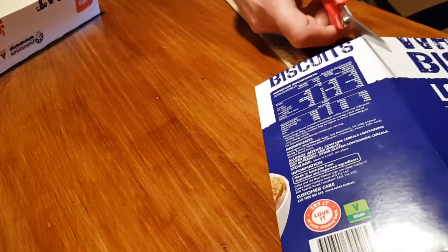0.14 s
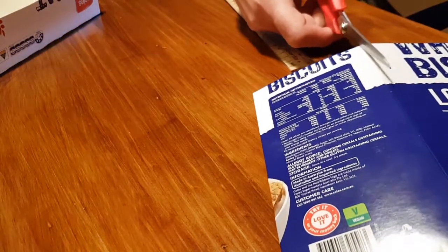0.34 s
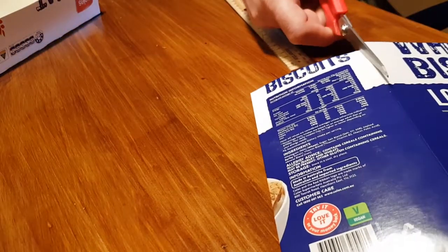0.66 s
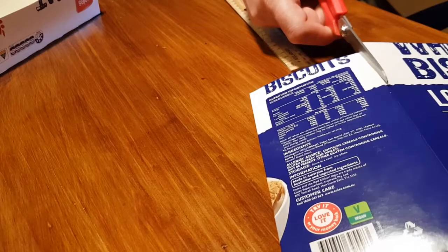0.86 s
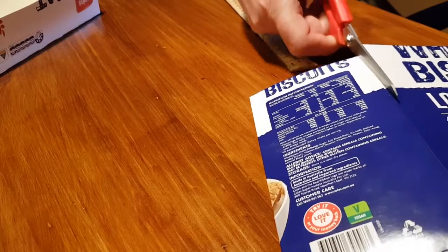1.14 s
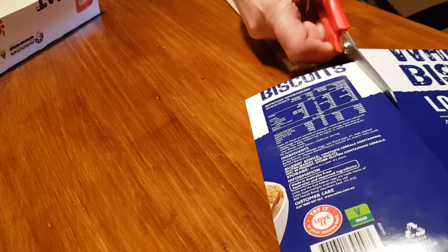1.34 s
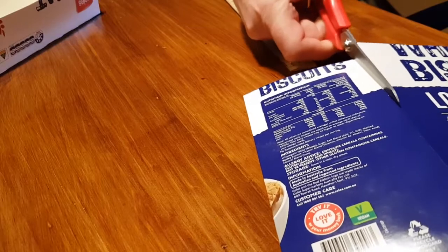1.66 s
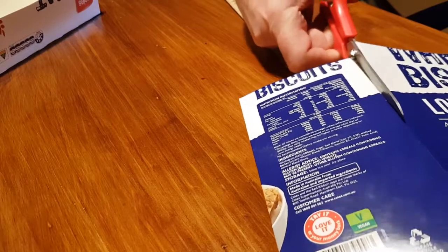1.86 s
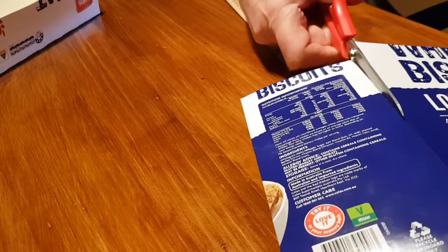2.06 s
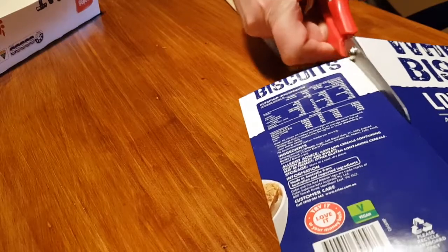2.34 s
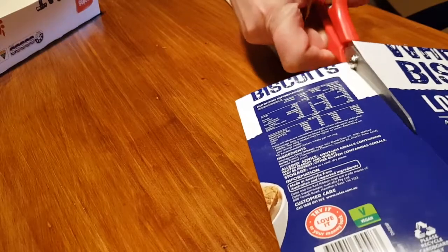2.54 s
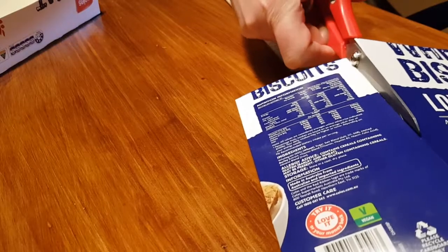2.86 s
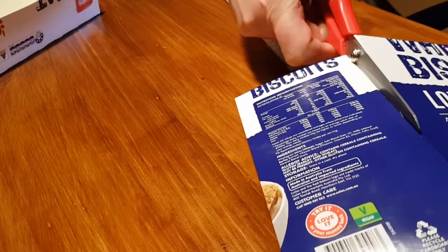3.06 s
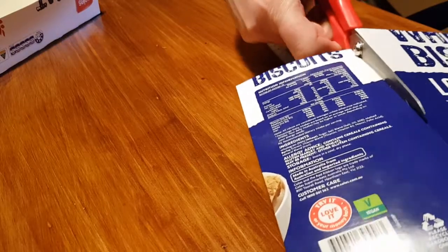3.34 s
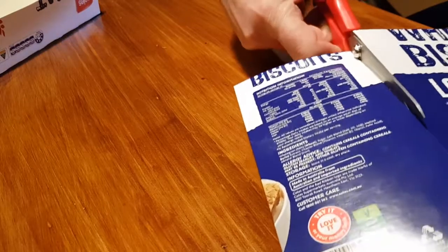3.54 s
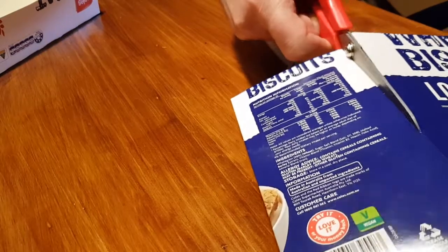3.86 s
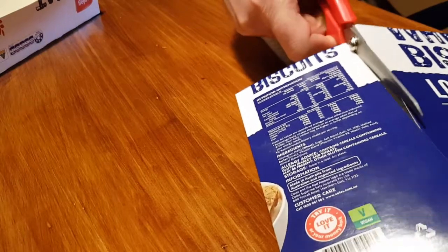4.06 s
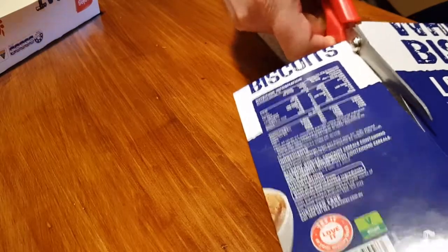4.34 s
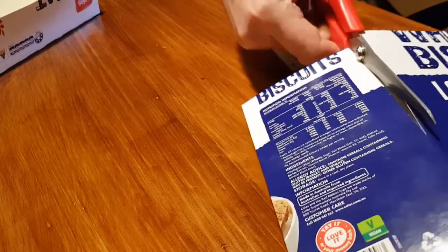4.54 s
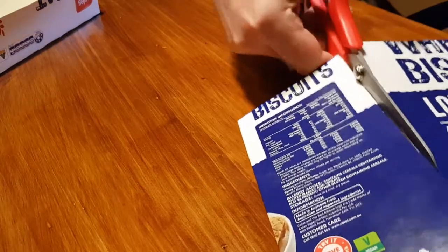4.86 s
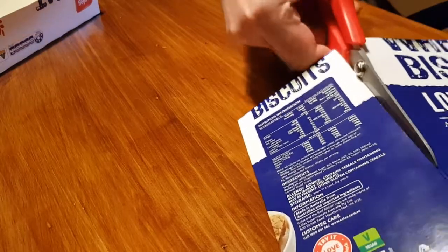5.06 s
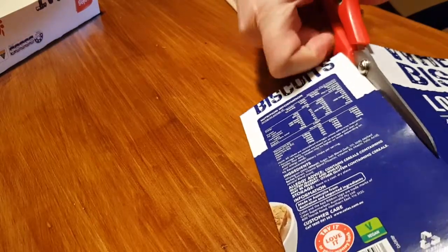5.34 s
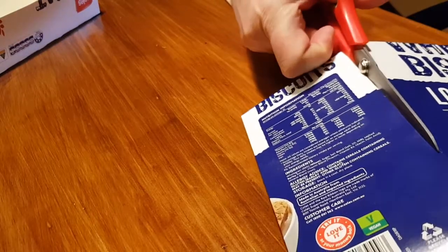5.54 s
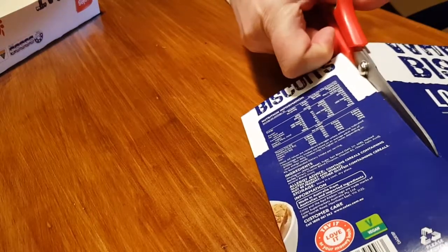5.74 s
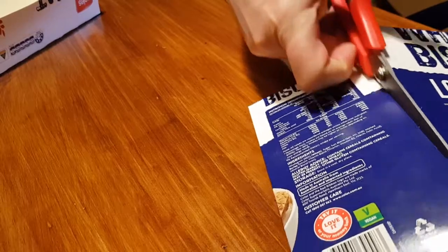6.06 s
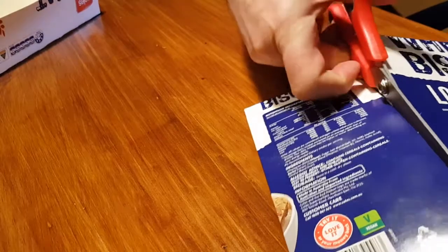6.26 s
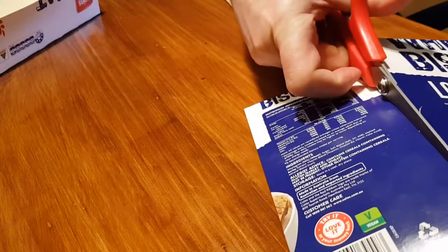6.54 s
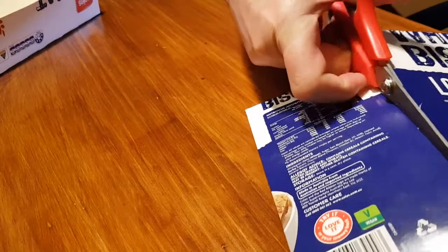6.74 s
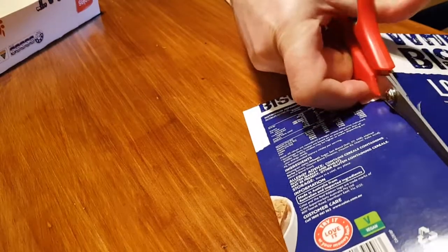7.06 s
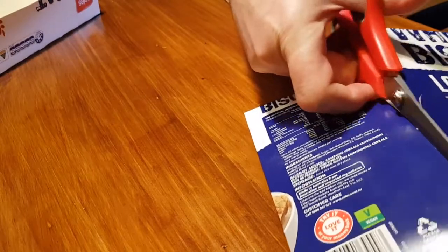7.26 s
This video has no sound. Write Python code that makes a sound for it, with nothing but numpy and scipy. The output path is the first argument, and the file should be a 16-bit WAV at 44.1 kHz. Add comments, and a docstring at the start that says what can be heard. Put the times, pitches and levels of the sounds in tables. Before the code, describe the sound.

Scissors snip through a thin cardboard box with crunchy rasps and hollow cracks, hardest near four and five seconds, low thumps on a wooden table.

```python
"""Scissors cut a thin cardboard box on a wooden table, close to a two-port microphone in a quiet room.
Over a steady hum and low drag, the first strokes and snaps come at about 0.2 s: shearing force rings
the hollow box near 700-900 Hz and rasps in the card, with fibres cracking and blade edges ticking.
The hardest snaps fall near 3.86 s and 5.26 s, with low thumps of table and box as decaying tones;
more thumps and the heaviest drag come at about 7 s, then the last stroke. A noise tail is the room."""
import sys
import numpy as np
from scipy import signal
from scipy.fft import rfft, irfft, next_fast_len
from scipy.io import wavfile

SR = 44100
rng = np.random.default_rng(int(sys.argv[2]) if len(sys.argv) > 2 else 0)


def bounce(signal):
    """Save signal as a 16-bit WAV file at the path given by the first command-line argument."""
    frames = np.transpose(np.atleast_2d(signal))
    limited = np.clip(frames, -1, 1)
    pcm = np.round(limited * 32767).astype(np.int16)
    wavfile.write(sys.argv[1], SR, pcm)


N = 326781

# Blade strokes through the card. Each row: start, turning and stop moment in seconds, force on the box
# at the bite, at the turn and at the stop in dB, rasp over ring in dB, relative treble of the rasp in dB.
BLADE_STROKES = [(0.251, 0.528, 0.57, -57, -56.5, -60.5, -3, -0.5),
                 (0.601, 0.77, 0.84, -52.5, -44.5, -66, -3, -1),
                 (0.956, 1.13, 1.195, -56, -51.5, -57, -4, 8),
                 (1.302, 1.478, 1.512, -55, -51.5, -59, 3, -0.5),
                 (1.532, 1.6, 1.59, -72, -73, -71, 0.5, 11),
                 (1.644, 1.742, 1.837, -52, -48.5, -53.5, 2.5, 0),
                 (1.852, 1.9, 1.91, -63, -63, -64, -1, -7),
                 (1.965, 2.032, 2.046, -40.5, -42, -43, -1, -9.5),
                 (2.071, 2.077, 2.165, -57, -62, -72, 0, -4),
                 (2.256, 2.388, 2.44, -52.5, -47.5, -52, 2.5, -1), (2.48, 2.49, 2.48, -52, -51, -50, -7, 4),
                 (2.527, 2.592, 2.68, -47.5, -41.5, -73, 5, -3.5),
                 (2.781, 2.829, 2.88, -61, -48, -66.5, 0.5, -4.5),
                 (2.891, 2.96, 3.01, -67, -61.5, -74, -1.5, 5),
                 (3.046, 3.1, 3.24, -52, -66.5, -70, -15, -1),
                 (3.251, 3.298, 3.4, -58.5, -61, -71, 2.5, 4.5),
                 (3.442, 3.461, 3.57, -57, -52, -79, -4.5, 8.5),
                 (3.608, 3.674, 3.704, -66.5, -32.5, -51, -6.5, -8.5),
                 (3.729, 3.814, 3.83, -51.5, -43, -43, 6, 2.5),
                 (3.851, 3.875, 3.986, -35, -40.5, -63, -0.5, 7),
                 (4.003, 4.06, 4.135, -55.5, -36, -59, -8, 6.5),
                 (4.145, 4.21, 4.27, -62.5, -54.5, -67.5, 3, 0.5),
                 (4.288, 4.31, 4.34, -54, -55.5, -66, 4, 3),
                 (4.345, 4.395, 4.42, -61.5, -55.5, -62, 9, -0.5),
                 (4.452, 4.548, 4.64, -54.5, -50, -61, -1, -1.5),
                 (4.657, 4.708, 4.754, -53.5, -43, -50, -1, 5.5),
                 (4.79, 4.957, 5.005, -52, -49.5, -51.5, -1, 0), (5.015, 5.055, 5.08, -59, -62, -62, 0, -1),
                 (5.088, 5.172, 5.232, -60, -46, -58.5, 4.5, 2),
                 (5.255, 5.285, 5.43, -19.5, -46, -52, -2, 1.5),
                 (5.449, 5.467, 5.54, -43.5, -49.5, -64, 2, 5),
                 (5.577, 5.722, 5.75, -72.5, -65, -66.5, 0, 7.5),
                 (5.777, 5.813, 5.94, -67, -68.5, -66.5, -1.5, -0.5),
                 (5.905, 5.943, 6.1, -60, -49.5, -47, 2.5, -1.5),
                 (6.001, 6.008, 6.225, -39, -36, -61.5, 0, 2.5),
                 (6.293, 6.401, 6.47, -42.5, -45, -58, -4, 0),
                 (6.484, 6.55, 6.59, -50.5, -46.5, -61, -3, 2.5), (6.6, 6.63, 6.6, -59, -56.5, -62, -8, -1),
                 (6.683, 6.771, 6.836, -48.5, -44.5, -53, -0.5, 6),
                 (6.853, 6.88, 6.95, -60, -58.5, -59, -0.5, -4),
                 (6.917, 6.93, 7.02, -46, -51.5, -50, -2.5, -5),
                 (6.97, 6.999, 7.16, -26.5, -28, -61, -6, 1), (7.214, 7.272, 7.36, -52.5, -43, -52, 0, 7)]
BITE_S, BITE_FROM_DB = 0.015, -10.5   # bite time, and how far below the bite level it sets in
FADE_DB_S = 390.5   # how fast a stroke dies once the blades stop, dB per second
TREBLE_RISE_S, TREBLE_PER_DB = 0.066, 0.46   # the treble sets in late and swings wider than the level
STROKE_TOP_HZ = 11100   # strokes dull above this


def strokes():
    """Dense fibre breaks as the blades bite and shear; the grip slips and catches, so they come in clumps."""
    catches = drift(43)
    grit = rms_one(amp(0.97 * drift(390)) * rng.standard_normal((2, N)))
    dull, treble = split(grit)
    treble = signal.lfilter(*signal.butter(1, STROKE_TOP_HZ, fs=SR), treble)
    # the blades sing along
    treble += amp(-10.5) * resonate(treble, STEEL_MODES, wander_db=4.0) / unit_gain(STEEL_MODES)
    ring, rasp, bright = np.zeros((3, N))
    shear = np.zeros(N)
    for start, turn, stop, bite_db, turn_db, stop_db, rasp_db, treble_db in BLADE_STROKES:
        span = slice(round(start * SR), min(N, round(stop * SR) + SR // 5))
        s = np.arange(span.start, span.stop) / SR
        level_db = np.interp(s, [start, turn, stop], [bite_db, turn_db, stop_db])
        level_db += BITE_FROM_DB * np.clip(1 - (s - start) / BITE_S, 0, 1)
        rough = np.clip(0.8 - 0.068 * treble_db, .15, 1.5)   # a bright slide runs smoother
        fade_db = FADE_DB_S * np.maximum(s - stop, 0)
        force = amp(level_db + 1.6 * rough * catches[span] - fade_db)
        rasp_force = force * amp(rasp_db)
        ring[span] += force
        rasp[span] += rasp_force
        shear[span] += rasp_force * rough
        swing_db = TREBLE_PER_DB * (level_db - max(turn_db, bite_db))
        late_db = 9.9 * np.exp(-(s - start) / TREBLE_RISE_S)
        bright[span] += force * amp(rasp_db + treble_db + 2.0 + swing_db - late_db)
    rasp_sound = rasp * dull + bright * amp(0.87 * drift(29)) * treble
    return ring * grit, rasp_sound, fibres(shear)


FIBRES_PER_S, FIBRE_DB, FIBRE_CYCLES = 900, -4.5, 26   # mean rate, gain, and pitch over resonance width


def fibres(force):
    """Single fibres break at random under the blades, of uneven size, each ringing briefly at its own pitch."""
    sizes = amp(3.8 * np.minimum(rng.exponential(1, N), 4)) * rng.choice([-1, 1], N)
    born = rng.random(N) < FIBRES_PER_S / SR
    dealt = rng.integers(0, 16, N)   # which of the 16 pitches a fibre gets
    pitches = np.geomspace(1100, 5000, num=16)
    rings = []
    for k, hz in enumerate(pitches):
        mode = (hz, hz / FIBRE_CYCLES, -8.5 * np.log2(hz / 1000))
        rings.append(resonate(sizes * born * (dealt == k) + 1e-18, [mode]))
    shared = sum(rings)
    own = .5 * (sum(rings[::2]) - sum(rings[1::2]))
    return amp(FIBRE_DB) * force * rms_one(np.array([shared, own]))


# Tearing snaps of the card. Each row: moment in seconds, relative level in dB, rasp over ring in dB,
# pitch of the crack in Hz, box pitch it favours in Hz.
TEARING_SNAPS = [(0.212, -52.0, -1, 2270, 805), (0.272, -40.5, 3.5, 4470, 815),
                 (0.302, -40.5, 2.0, 2280, 860), (0.345, -41.5, 0, 2300, 830), (0.37, -41.0, 4, 1900, 690),
                 (0.403, -32.5, -1.5, 1510, 720), (0.44, -44, -1, 1600, 670), (0.472, -33, 1, 1100, 760),
                 (0.495, -31, -2, 1640, 715), (0.514, -27.5, -7, 1660, 680), (0.548, -28, -10.0, 1840, 760),
                 (0.59, -38.5, -4, 1660, 690), (0.624, -26, -2, 1310, 790), (0.654, -33, -2, 1860, 790),
                 (0.684, -26.5, -5, 2540, 720), (0.697, -26.0, -4, 1280, 770),
                 (0.727, -18.5, -4, 1810, 760), (0.753, -25.5, -3, 2400, 740),
                 (0.767, -21.0, -7.5, 1890, 750), (0.795, -28, -1.5, 2200, 790),
                 (0.91, -52, -16, 1100, 680), (1.26, -41.5, -4, 1650, 680), (1.314, -30, 4.5, 1900, 680),
                 (1.347, -26, 3, 2460, 840), (1.366, -31, 2.0, 2400, 830), (1.385, -28.5, 1, 2640, 760),
                 (1.407, -22.5, 1, 1950, 724), (1.428, -33.5, 13, 2540, 860), (1.458, -30, 1, 3700, 850),
                 (1.473, -26, 6, 2120, 690), (1.605, -53, 6, 3380, 690), (1.649, -41.5, 1.0, 1460, 860),
                 (1.723, -31, -5, 1900, 880), (1.969, -20, -10, 1610, 800), (1.981, -23.5, -3.0, 1650, 800),
                 (1.995, -20.5, -3, 1840, 776), (2.008, -25, 0.5, 1750, 700), (2.023, -26.5, -3, 1950, 800),
                 (2.04, -18.5, 2, 2000, 856), (2.228, -51.5, 7, 1500, 770), (2.264, -29.5, 0.5, 1420, 880),
                 (2.336, -24, -7, 1421, 810), (2.482, -33, -14, 1100, 760), (2.493, -32.5, 0, 1410, 730),
                 (2.533, -27.5, 7, 1620, 860), (2.56, -31, 3.5, 1600, 820), (2.572, -29, 3, 1600, 820),
                 (2.585, -21.5, 5.5, 1330, 750), (2.605, -33, 2.0, 2400, 770),
                 (2.818, -34.5, -4, 1560, 710), (2.966, -35.5, -6, 1640, 880),
                 (3.145, -59.0, 5.0, 1500, 890), (3.195, -60, 7, 1400, 780), (3.262, -46.5, 7, 1300, 760),
                 (3.283, -38.5, 2, 1332, 820), (3.3, -40.5, 9, 1400, 780), (3.368, -43.5, 5.5, 1400, 850),
                 (3.402, -53.0, 5.5, 2500, 830), (3.462, -37.5, 4, 1690, 770),
                 (3.632, -32.5, -3, 1630, 770), (3.672, -15, -9.0, 1980, 713), (3.757, -26, 4.5, 2550, 730),
                 (3.793, -17.0, 5, 1760, 755), (3.806, -25, 7, 1900, 810), (3.817, -17.5, 6, 1970, 810),
                 (3.837, -18, 4.5, 2100, 870), (3.859, -1, 0, 2366, 706), (4.047, -26.5, 8, 1800, 880),
                 (4.302, -41.5, 2.0, 1440, 730), (4.474, -37, -1, 1630, 690), (4.542, -28, -1.5, 4006, 740),
                 (4.687, -33.5, -1, 2750, 686), (4.872, -29.5, -5, 1310, 730), (4.94, -33, -2, 2000, 749),
                 (5.003, -35.5, 1, 2480, 789.8), (5.178, -22.0, 2.5, 2500, 810),
                 (5.209, -33.5, 2, 2510, 899.4), (5.2555, -3.0, -4.0, 1550, 818),
                 (5.263, -24, -12, 3300, 730), (5.341, -21, -6.5, 2580, 680), (5.407, -22.5, -8, 2410, 800),
                 (5.455, -25, -2, 1770, 830), (5.515, -34.5, 1.5, 1890, 860),
                 (5.59, -49.5, 4.0, 2400, 910.2), (5.632, -40.0, 2, 2400, 870),
                 (5.656, -52.0, 3, 3900, 780), (5.673, -51, -1, 2399, 900), (5.698, -49, 4.0, 2500, 850),
                 (5.718, -51.5, 2, 2500, 790), (5.76, -49.0, -2, 1100, 820), (5.779, -47, -7, 1100, 738),
                 (5.793, -38.0, 0.5, 1100, 770), (5.928, -32, -9.0, 1980, 770),
                 (5.953, -30.0, -7, 2520, 650), (6.01, -13.0, -4, 1100, 745), (6.19, -28, 5.5, 1315, 810),
                 (6.296, -23.5, -4, 1312, 765), (6.325, -22, -2.5, 2020, 695), (6.34, -27, -5, 1900, 680),
                 (6.36, -19.5, -5.5, 1360, 780), (6.375, -26.0, -3.0, 1300, 750),
                 (6.392, -20.5, -2.5, 1330, 760), (6.432, -34, -3.0, 2700, 780),
                 (6.49, -24.5, 1, 1220, 720), (6.497, -26, -1.5, 2520, 746), (6.529, -21.5, -2, 2500, 711),
                 (6.535, -19, -2.5, 1335, 710), (6.625, -32, -8.0, 1220, 720),
                 (6.687, -38, -13.0, 1220, 770), (6.922, -24.5, -3, 1100, 860),
                 (6.953, -34, 0.0, 1310, 679), (6.98, -10.5, -3, 1250, 710), (7.006, -8, -10.5, 1290, 744),
                 (7.052, -19.5, 1, 1250, 770), (7.234, -37.0, -5.0, 1180, 820),
                 (7.397, -29.5, 4.5, 1800, 840)]
SNAP_LEAD_S = 0.001887   # the force builds this long before the snap is heard
# decay time of a -29.5 dB snap and treble gain of a -26 dB one; harder snaps are shorter and duller
SNAP_T60_S, SHORTER_S_PER_DB, SNAP_TREBLE_DB, DULLER_DB_PER_DB = 0.048, 0.0044, -7.5, 0.1838
CRACK_MODES_DB, CRACK_SPREAD_DB = 0.5, 5.0   # each crack drives the blade modes with strengths of its own
CRACK_PITCH_SPREAD = 0.06   # random spread of each mode's pitch from snap to snap, as a share
# a box mode is driven less the further it lies from the one a snap favours
LEAN_DB_PER_OCTAVE, LEAN_MOST_DB = 25.5, 7


def snaps():
    """Each snap is a jolt and a brief noisy force that rings the box and cracks at a pitch of its own."""
    rasp, rings = np.zeros((2, 2, N))
    white = rng.standard_normal((2, N))
    clumps = amp(1.6 * drift(300))   # a tear goes in jerks
    dull, treble = split(white)
    shape = (len(TEARING_SNAPS), len(BLADE_MODES))
    strengths_db = CRACK_MODES_DB + CRACK_SPREAD_DB * rng.standard_normal(shape)
    pitch_factors = 1 + CRACK_PITCH_SPREAD * rng.standard_normal(shape)
    box_gain = unit_gain(BOX_MODES)
    for (s, db, rasp_db, hz, ring_hz), more_db, factors in zip(TEARING_SNAPS, strengths_db, pitch_factors):
        t60 = max(SNAP_T60_S - SHORTER_S_PER_DB * (db + 29.5), .008)
        treble_db = SNAP_TREBLE_DB - DULLER_DB_PER_DB * (db + 26.0)
        at = round((s - SNAP_LEAD_S) * SR)
        t = np.arange(min(SR // 8, N - at)) / SR
        span = slice(at, at + len(t))
        burst = amp(db - 5.0 - 60 * t / t60) * np.minimum(t / 0.002, 1) * clumps[span]
        force = amp(-3.5) * burst * white[:, span]
        jolt = amp(db + 12.0) * np.array([1, .45])
        force[:, round(SNAP_LEAD_S * SR / 2)] += jolt
        box = []
        for f, width, level_db in BOX_MODES:
            lean_db = min(LEAN_DB_PER_OCTAVE * abs(np.log2(f / ring_hz)), LEAN_MOST_DB)
            box.append((f, width, level_db - lean_db))
        rings[:, span] += amp(3.5) * resonate(force, box) / box_gain
        tear = amp(rasp_db - 1.5 - 7.8 * t / t60)   # the rasp of a tear is over sooner
        tear_noise = dull[:, span] + amp(treble_db) * treble[:, span]
        rasp[:, span] += amp(-4.0) * tear * burst * tear_noise
        crack = [(hz, 0.059 * hz, 15.5)]
        for (f, width, level_db), more, factor in zip(BLADE_MODES, more_db, factors):
            crack.append((f * factor, 1.21 * width, level_db + more - 1.5 * abs(np.log2(f / hz))))
        rings[:, span] += resonate(tear * force, crack)
    return rasp, rings


# Air and panel resonances of the hollow box. Each row: pitch in Hz, width in Hz, relative level in dB.
BOX_MODES = [(427, 39, -13), (515, 53, -7.5), (680.1, 36.8, 5), (785, 56.6, 4), (885, 45, 2),
             (1003, 70, -4.5)]
# Stiffer card and blade resonances in the rasp. Each row: pitch in Hz, width in Hz, relative level in dB.
BLADE_MODES = [(1284, 120, 10.5), (1404, 130, 9), (1669, 197, 13), (1840, 18, 11), (1900, 71, 3.5),
               (2455, 127, 6.5), (2916, 130, 6), (3700, 150, -1), (4320, 97, 1.5), (4670, 80, 0),
               (5500, 120, -4), (7120, 180, -3.5)]
# Spectrum of the broad rasp. Each row: frequency in Hz, relative level in dB.
RASP_SPECTRUM = [(180, -34.5), (300, -12.5), (366, -10), (424, -11), (535, -10.5), (674, -12.5), (781, -5),
                 (1070, -8), (2520, -7), (3070, -10.5), (7020, -16.5), (8280, -23.5), (9760, -20.5),
                 (15500, -20.5)]


def card(ring_force, rasp_force, blade_db):
    """The shearing force rings the hollow box and sounds as a broad rasp."""
    ring = resonate(ring_force, BOX_MODES, wander_db=1.8) / unit_gain(BOX_MODES)
    # the pair is swapped, so resonances and broad rasp have unrelated grain
    modes = resonate(rasp_force[::-1], BLADE_MODES, wander_db=3.5) / unit_gain(BLADE_MODES)
    return ring + colour(rasp_force, RASP_SPECTRUM) + amp(blade_db) * modes


# Bright ticks of the blade edges. Each row: start in seconds, relative level in dB, pitch in Hz.
EDGE_TICKS = [(0.6818, -38.5, 5300), (0.7275, -32.5, 5340), (0.9582, -57, 6680), (1.3126, -44, 5370),
              (1.4072, -38, 3700), (1.427, -33, 3720), (1.471, -42, 3620), (1.701, -40, 5580),
              (1.754, -38, 4710), (2.0392, -38, 3840), (3.4595, -38, 6040), (3.7579, -44, 3920),
              (3.7918, -31, 4570), (3.8154, -28, 4540), (3.837, -23, 6300), (3.8567, -15, 7130),
              (4.048, -28, 4587), (4.1408, -34, 12300), (4.3843, -38, 6530), (4.5441, -35, 3830),
              (4.8269, -41, 3610), (4.9656, -42, 4510), (5.177, -22, 4240), (5.254, -27, 3954),
              (5.3416, -35, 4250), (5.4086, -37, 4550), (6.0092, -28, 3860), (6.2956, -42, 5060),
              (6.325, -34, 4470), (6.3608, -40, 5960), (6.3934, -33.5, 5300), (6.488, -37, 6172),
              (6.5271, -35, 3910), (6.975, -30, 6100), (7.0466, -29.5, 4790), (7.235, -38, 3960)]
TICK_T60_S = 0.033   # decay time of the noise burst


def ticks():
    """Each tick is a very short bright burst with a ring at its own pitch."""
    out = np.zeros((2, N))
    t = np.arange(SR // 20) / SR
    for s, db, hz in EDGE_TICKS:
        envelope = amp(db - 6.0 - 60 * t / TICK_T60_S) * np.minimum(t / 0.00054, 1)
        burst = envelope * rng.standard_normal((2, len(t)))
        burst = signal.lfilter(*signal.butter(2, 3500, "high", fs=SR), burst) * [[1], [.6]]
        at = round(s * SR)
        out[:, at:at + len(t)] += amp(-1.0) * burst + resonate(burst, [(hz, 0.06 * hz, 10.5)])
    return out


# Steel sliding on steel as the blades open wide. Each row: time in seconds, level in dB.
STEEL_SLIDE = [(0.18, -98), (0.22, -69.5), (0.256, -68), (0.268, -57), (0.528, -76), (0.608, -88),
               (0.62, -57), (0.64, -110), (3.18, -110), (3.2, -72), (3.25, -68), (3.31, -76)]
# Resonances of the steel. Each row: pitch in Hz, width in Hz, relative level in dB.
STEEL_MODES = [(2270, 176, -6.5), (4240, 250, 4), (4682, 250, 1), (7240, 180, -8.5)]


def steel():
    """Gritty friction of steel on steel, heard through the blade resonances."""
    friction = amp(in_time(STEEL_SLIDE)[0] + 4.2 * drift(80)) * sounding(STEEL_SLIDE)
    grit = friction * rng.standard_normal((2, N))
    return resonate(grit + 1e-18, STEEL_MODES) / unit_gain(STEEL_MODES)


# Box dragging on the table top. Each row: time in seconds, level in dB.
BOX_DRAG = [(0.0, -79), (0.47, -74.5), (1.11, -56), (1.44, -74), (1.71, -53), (2.15, -63), (2.45, -58),
            (2.5, -45), (2.72, -63.5), (3.12, -49.5), (3.4, -59.5), (3.78, -51.5), (4.27, -57.5),
            (4.56, -50), (5.1, -55.5), (5.34, -43.5), (5.55, -65.5), (5.96, -51.5), (6.72, -57),
            (7.03, -34), (7.17, -47), (7.41, -54)]
# Spectrum of the drag through the wood. Each row: frequency in Hz, relative level in dB.
DRAG_SPECTRUM = [(12, -32), (20, -20.5), (52, 0.5), (81, 2.5), (118, 3.5), (206, -1), (329, -8.5),
                 (422, -34), (450, -5.5), (580, -38.5), (990, -120)]
# Low thumps of table and box, some under the hardest snaps. Each row: start in seconds, level in dB,
# pitch in Hz, 60 dB decay time in seconds.
LOW_THUMPS = [(1.418, -42, 129, 0.26), (1.721, -37.5, 71, 0.18), (2.063, -33.5, 105, 0.068),
              (2.273, -40, 72.7, 0.074), (2.478, -31, 103, 0.12), (2.49, -31.5, 150, 0.07),
              (2.945, -47, 104.6, 0.2), (3.048, -34, 200, 0.1), (3.07, -33, 130, 0.09),
              (3.055, -32, 90.4, 0.21), (3.09, -31.5, 142.4, 0.17), (3.135, -37, 100, 0.15),
              (3.158, -35, 95, 0.09), (3.265, -44, 91.5, 0.11), (3.466, -40, 123.2, 0.093),
              (3.676, -27, 91.5, 0.066), (3.856, -24, 149, 0.066), (3.857, -25.5, 272, 0.062),
              (3.858, -18.5, 397, 0.059), (4.564, -34.5, 94.24, 0.074), (4.735, -31.5, 95, 0.12),
              (4.867, -34, 107.6, 0.17), (5.097, -35, 77.4, 0.084), (5.17, -31.5, 80.5, 0.16),
              (5.255, -22.5, 259, 0.072), (5.256, -19.5, 413, 0.052), (5.911, -36.5, 115, 0.14),
              (6.014, -18.5, 100.9, 0.1), (6.016, -23, 202, 0.1), (6.313, -37, 120, 0.1),
              (6.525, -33, 136, 0.07), (6.75, -40, 100.2, 0.092), (6.839, -37.5, 131, 0.081),
              (6.862, -32, 171.1, 0.07), (6.977, -18, 195, 0.15), (6.99, -25, 290, 0.11),
              (7.02, -17, 167, 0.08), (7.044, -30, 166, 0.098), (7.06, -28.5, 260, 0.086),
              (7.08, -27.5, 199, 0.067), (7.105, -28.5, 175, 0.069), (7.13, -35.5, 190, 0.07)]


def table():
    """Lumpy low drag of the box, and low thumps of table and box as decaying tones."""
    drag_db = in_time(BOX_DRAG)[0]
    rumble = colour(rng.standard_normal((2, N)), DRAG_SPECTRUM)
    deep = signal.lfilter(*signal.butter(1, 120, fs=SR), rumble)
    # pressed harder, the box loses its deepest rumble
    lost = np.clip((drag_db + 50.5) / 15, 0, .9)
    out = amp(drag_db + 3.6 * drift(9.0)) * (rumble - deep * lost)
    for s, db, hz, t60 in LOW_THUMPS:
        at = round(s * SR)
        t = np.arange(min(SR // 2, N - at)) / SR
        body = amp(db - 60 * t / t60) * np.minimum(t / 0.0034, 1)
        # sine and cosine for the shared and the unshared sound
        wave = np.array([np.sin(2 * np.pi * hz * t), np.cos(2 * np.pi * hz * t)])
        # a second, higher mode rings along
        upper = amp(-6 - 42.0 * t / t60) * np.sin(2 * np.pi * 2.3 * hz * t)
        out[:, at:at + len(t)] += body * (wave + upper)
    return out


ROOM_T60_S, ROOM_DB, WALL_CUT_HZ = 0.49, -26.5, 12000   # decay time, tail gain, dulling of the tail


def room(x):
    """The room answers with a dull, decaying noise tail, another one in each channel."""
    t = np.arange(SR // 2) / SR
    tail = rng.standard_normal((2, len(t))) * amp(-60 * t / ROOM_T60_S) * (t > .004)
    tail = signal.lfilter(*signal.butter(1, WALL_CUT_HZ, fs=SR), tail)
    tail = tail / np.sqrt(np.sum(tail[0] ** 2))
    return amp(ROOM_DB) * signal.oaconvolve(x[None], tail, axes=1)[:, :N]


# Spectrum of the quiet room. Each row: frequency in Hz, relative level in dB.
AIR_SPECTRUM = [(12, -64.5), (20, 9.5), (104, 6.5), (248, -14), (388, -46.5), (873, -22), (1120, -19.5),
                (2460, -30.5), (3530, -23.5), (6910, -27), (8410, -31.5), (12800, -20), (16000, -23)]
AIR_DB = -60.5
# Steady hum of the room. Each row: frequency in Hz, level in dB.
ROOM_HUM = [(97, -66.5), (201, -73.5), (250, -75), (338, -85.5)]


def air():
    """Quiet room noise with a hum of steady sines."""
    t = np.arange(N) / SR
    hum = sum(np.sqrt(2) * amp(db) * np.sin(2 * np.pi * (hz * t + rng.random())) for hz, db in ROOM_HUM)
    return amp(AIR_DB) * colour(rng.standard_normal((2, N)), AIR_SPECTRUM) + hum * [[1], [0]]


# The two ports of the microphone. Each row: frequency in Hz, left lag in samples, left over right in dB,
# likeness of the two from 0 to 1.
MIC_PORTS = [(60, 2.5, 7, .45), (200, 3.5, 2, .7), (350, 3.5, -.5, .45), (700, 6.5, 3.3, .84),
             (1300, 8.5, 1.5, .55), (2500, 4.5, -1.5, .5), (4500, 3.5, 1.3, .35), (7000, .1, .8, .5),
             (14000, .1, .1, .5)]


def ports(pair):
    """A shared and an unshared sound become left and right, with lag, balance and likeness by frequency."""
    size = next_fast_len(N + 64)
    hz = np.maximum(np.fft.rfftfreq(size, 1 / SR), 1)
    shared, own = rfft(pair, size)
    alike = np.clip(at_hz(MIC_PORTS, hz, axis=3), 0, 1)
    shared = shared * np.sqrt((1 + alike) / 2)
    own = own * np.sqrt((1 - alike) / 2)
    # each port takes half of the lag and balance
    half_lag = np.exp(-1j * np.pi * hz * at_hz(MIC_PORTS, hz) / SR)
    half = amp(at_hz(MIC_PORTS, hz, axis=2) / 2) * half_lag
    return irfft(np.array([(shared + own) * half, (shared - own) / half]), size)[:, :N]


def amp(db):
    """Gain of a level in dB."""
    return 10 ** (np.asarray(db) / 20)


def rms_one(x):
    """Scaled to rms 1."""
    return x / np.sqrt(np.mean(x ** 2) + 1e-20)


def in_time(rows):
    """Each column of a curve, sample by sample."""
    s, *columns = np.transpose(rows)
    return [np.interp(np.arange(N) / SR, s, c) for c in columns]


def sounding(rows):
    """0 before the first row of a curve, 1 up to the last, then a quick fade."""
    s = np.arange(N) / SR
    return (s >= rows[0][0]) * amp(-FADE_DB_S * np.clip(s - rows[-1][0], 0, 1))


def at_hz(points, hz, axis=1):
    """A table column read on a log-frequency axis."""
    points = np.array(points)
    return np.interp(np.log(hz), np.log(points[:, 0]), points[:, axis])


def drift(rate_hz):
    """Slow random wander of rms 1, drawn at every 20th sample."""
    r = np.exp(-2 * np.pi * rate_hz * 20 / SR)
    slow = signal.lfilter([1], [1, -2 * r, r * r], rng.standard_normal(N // 20 + 2002))
    slow = slow[2000:]   # past the filter's start
    return np.interp(np.arange(N) / 20, np.arange(len(slow)), rms_one(slow))


TREBLE_HZ = 3160   # above this, one cut is brighter than another


def split(x):
    """All below the treble of a rasp, and the treble."""
    treble = signal.lfilter(*signal.butter(1, TREBLE_HZ, "high", fs=SR), x)
    return x - treble, treble


def resonate(x, modes, wander_db=0):
    """Parallel resonances of alternating sign; each may be driven harder or softer as the cut moves on."""
    out = 0
    for k, (hz, width_hz, db) in enumerate(modes):
        r = np.exp(-np.pi * width_hz / SR)
        b = amp(db) * (-1) ** k * (1 - r * r) / 2 * np.array([1, 0, -1])
        drive = amp(wander_db * drift(9.4)) if wander_db else 1
        out = out + signal.lfilter(b, [1, -2 * r * np.cos(2 * np.pi * hz / SR), r * r], x * drive)
    return out


def unit_gain(modes):
    """Rms that the resonances give to unit white noise."""
    return np.sqrt(np.sum(resonate(np.eye(1, SR // 2)[0], modes) ** 2))


def colour(x, spectrum):
    """Minimum-phase filter with the shape of a spectrum: nothing sounds early; power gain 1."""
    size = 4096
    hz = np.maximum(np.fft.rfftfreq(size, 1 / SR), 1)
    cepstrum = irfft(np.log(amp(at_hz(spectrum, hz))))
    # folding the cepstrum onto positive times gives minimum phase
    cepstrum[1:size // 2] *= 2
    cepstrum[size // 2 + 1:] = 0
    pulse = irfft(np.exp(rfft(cepstrum)))[None]
    return signal.oaconvolve(x, pulse / np.sqrt(np.sum(pulse ** 2)), axes=1)[:, :N]


def scene():
    """Cutting, table and quiet air at the two ports, and the room tail of the cutting."""
    ring, rasp, crackle = strokes()
    snap_rasp, snap_rings = snaps()
    cutting = card(ring + 1e-18, rasp + snap_rasp + 1e-18, blade_db=-5.0)
    cutting = cutting + snap_rings + crackle + ticks() + steel()
    return ports(cutting + table() + air()) + room(cutting[0])


RUMBLE_CUT_HZ, CUTOFF_HZ = 28, 15950


def record(dry):
    """The microphone channel cuts the deepest bass and the top."""
    dry = signal.sosfilt(signal.butter(3, RUMBLE_CUT_HZ, "high", fs=SR, output="sos"), dry)
    return signal.sosfilt(signal.cheby2(20, 70, CUTOFF_HZ, fs=SR, output="sos"), dry)


dry = scene()
out = record(dry)
bounce(out)
```